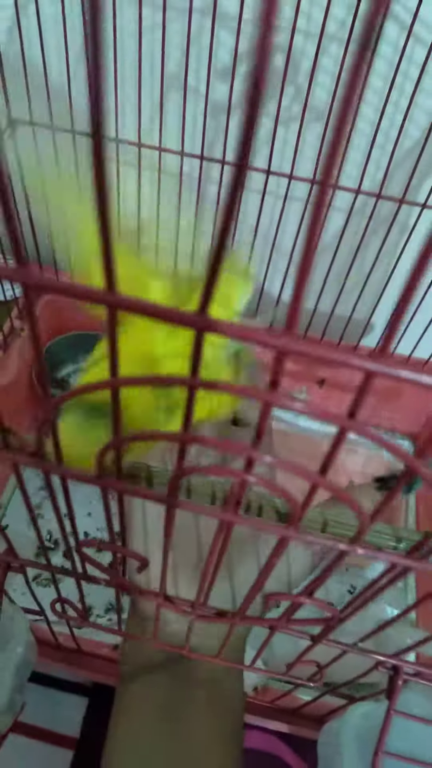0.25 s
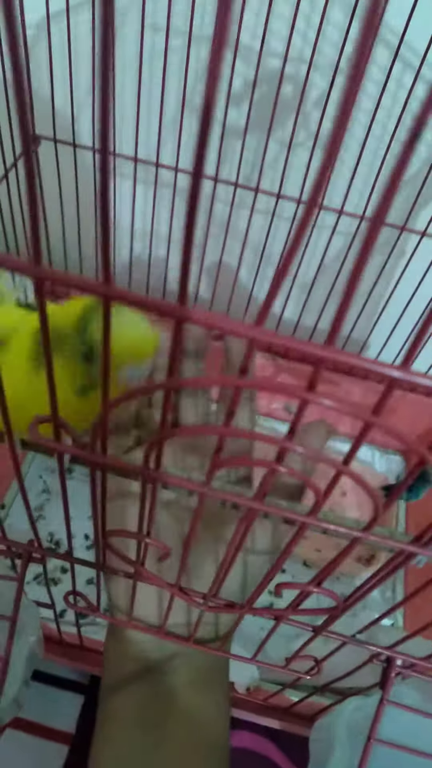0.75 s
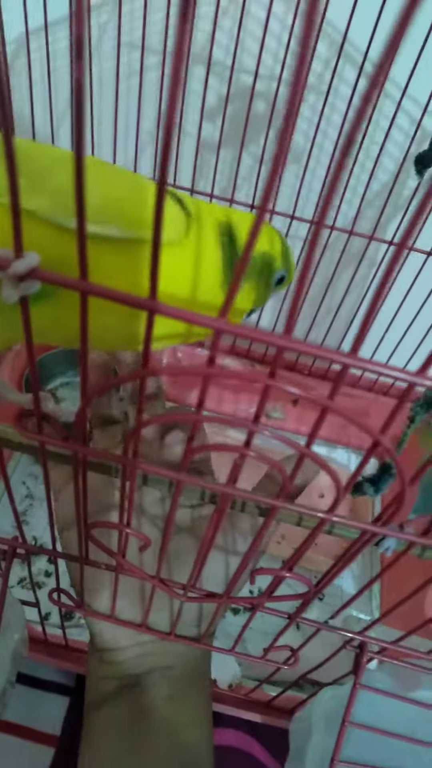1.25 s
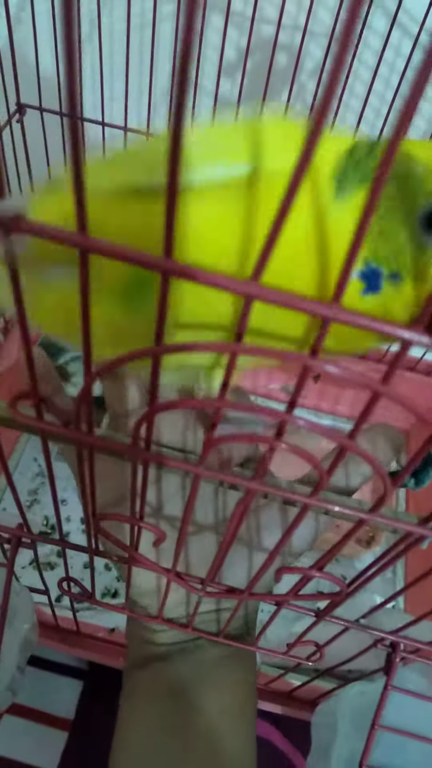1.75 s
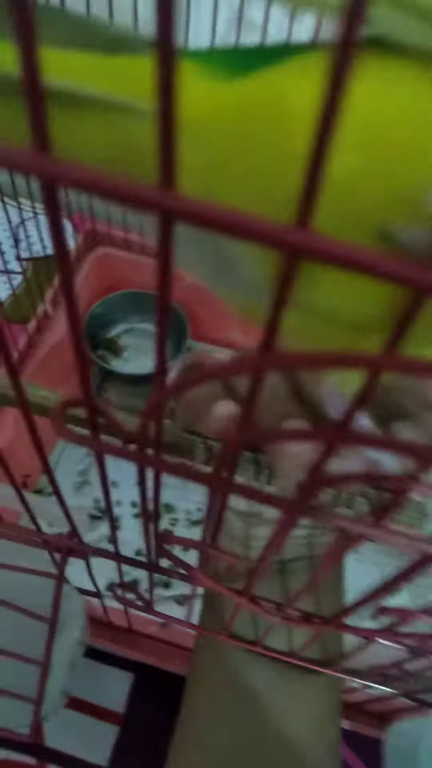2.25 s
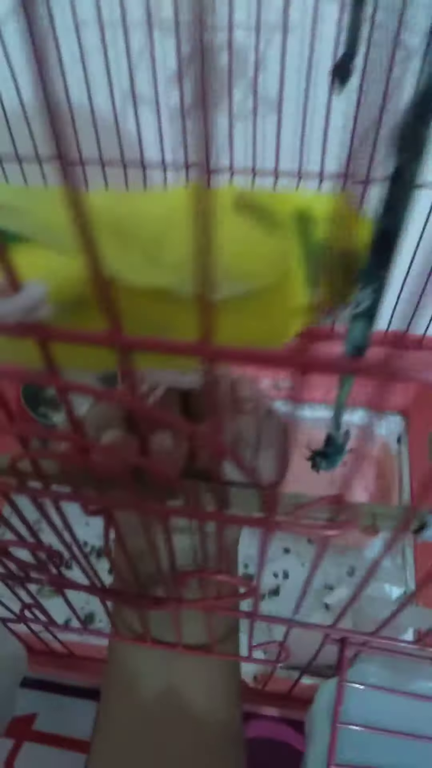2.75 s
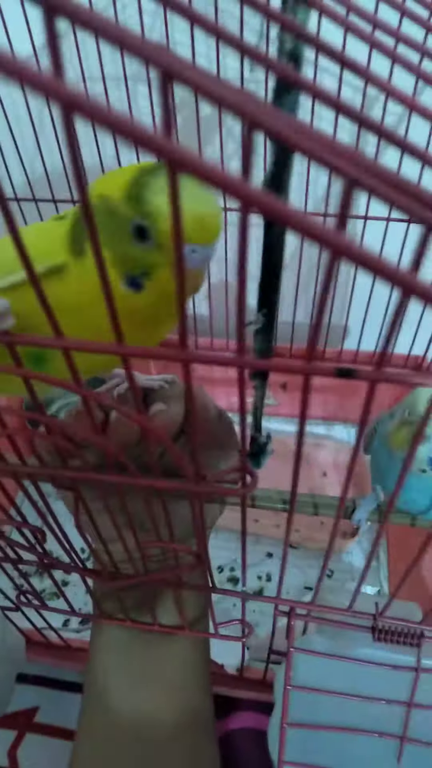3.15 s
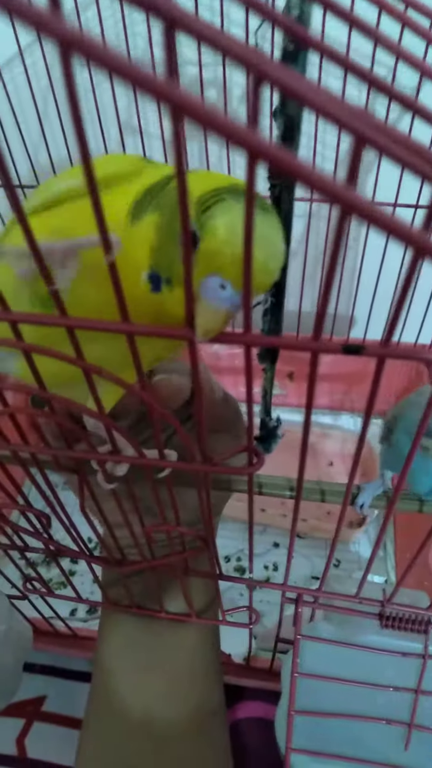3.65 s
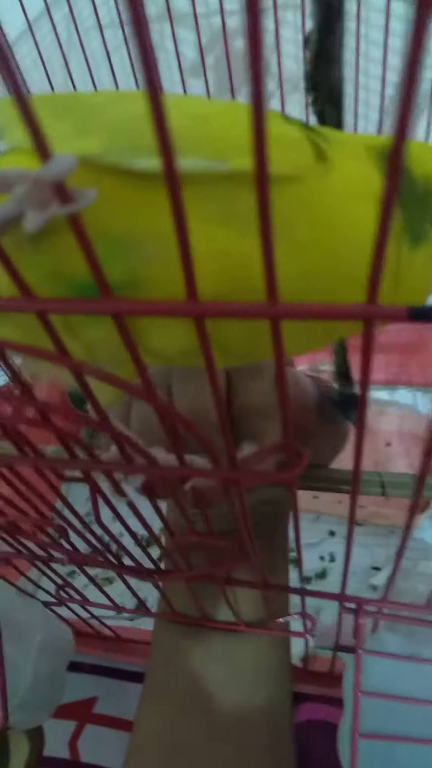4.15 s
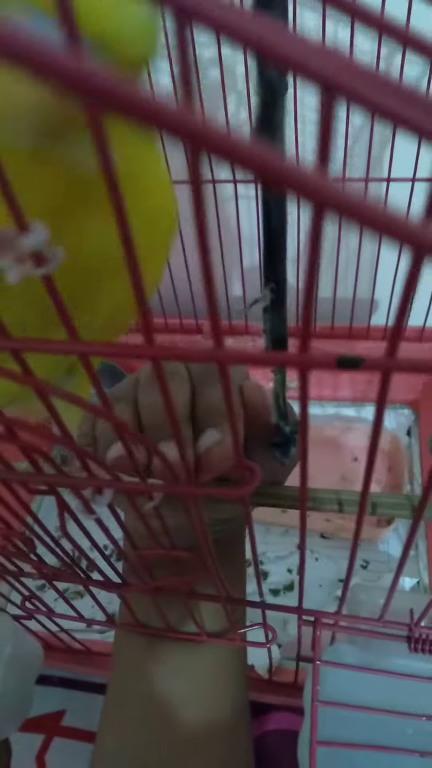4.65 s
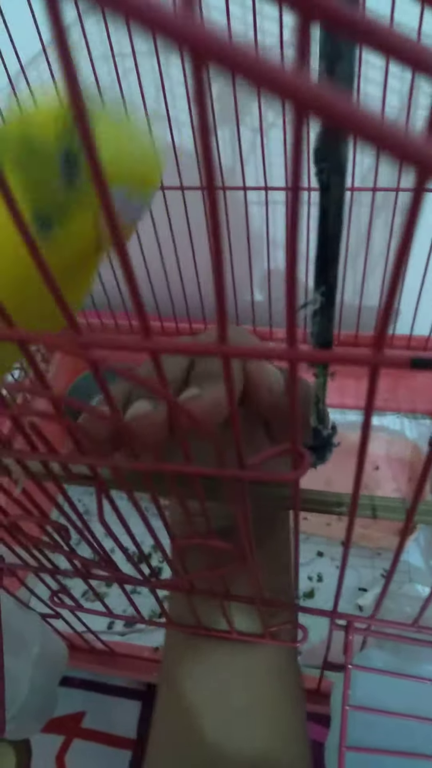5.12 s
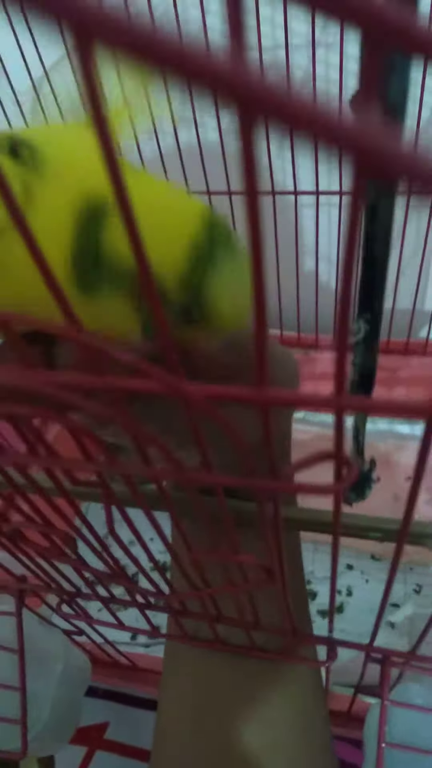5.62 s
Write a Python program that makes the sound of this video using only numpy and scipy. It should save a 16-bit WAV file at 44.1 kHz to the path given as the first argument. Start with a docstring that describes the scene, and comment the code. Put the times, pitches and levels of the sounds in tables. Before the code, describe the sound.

Claws scrape and rattle on thin metal cage bars very close by, with taps, dull bumps and short groans, ending in a bird's harsh squawk.

```python
"""Budgerigars on a wire cage

Budgerigars clamber and flutter on a wire cage, very close by, while a hand reaches in.
Claws and wings scrape the bars: each burst is followed by a short plateau of noise that a gate cuts off.
Taps and bumps are short filtered blows; groans and faint thin tones are narrow bands of noise.
Feathers hiss, the cage rumbles and murmurs, and near the end a bird's clicks run into a harsh squawk."""
import sys
import numpy as np
from scipy import signal
from scipy.fft import rfft, irfft
from scipy.io import wavfile
from scipy.ndimage import uniform_filter1d

SR = 44100
rng = np.random.default_rng(int(sys.argv[2]) if len(sys.argv) > 2 else 0)


def waveform_to_disk(signal):
    """Save audio, clipped to [-1, 1], as 16-bit WAV at the path in sys.argv[1]."""
    frames = np.transpose(np.atleast_2d(signal))
    scaled = np.clip(frames, -1, 1) * 32767
    samples = np.round(scaled).astype(np.int16)
    wavfile.write(sys.argv[1], SR, samples)


N = 259308
HZ = np.fft.rfftfreq(2048, 1 / SR)  # the pitches at which every filter gain is given

# Scrapes on the bars: start_s, stroke_s (nominal), plateau_end_s, clang_db (bars), ring_db (wires),
# brightness_db, main_ring_hz. The clang and ring levels are offset further for each layer.
SCRAPES = [(0.002, .028, .036, -53, -57, -1, 7610), (0.283, .02, .412, -46, -47, 3, 7910),
           (0.299, .008, .405, -47, -45, 5.5, 990), (0.877, .034, 1.004, -40, -41, 0, 1200),
           (1.095, .018, 1.12, -51, -37.5, 0, 7870), (1.117, .013, 1.245, -47, -32.5, 1.5, 7570),
           (1.745, .022, 1.778, -46, -47.5, -4.5, 8580), (1.782, .013, 1.92, -46, -37, 3.5, 9970),
           (1.872, .02, 1.92, -58, -45, 3, 7640), (1.921, .03, 2.055, -39, -42, -2.5, 5240),
           (2.052, .02, 2.18, -45, -35.5, 2, 9550), (2.267, .018, 2.37, -43, -43.5, -4, 7430),
           (3.256, .036, 3.32, -38, -51, -12, 840), (3.314, .016, 3.36, -42, -49, -10, 8060),
           (3.359, .02, 3.448, -40, -38.5, 0, 7380), (3.505, .028, 3.604, -43, -40.5, 3, 7100),
           (3.641, .014, 3.731, -42, -37.5, 3, 1830), (3.757, .014, 3.797, -38, -58, -1, 1400),
           (3.798, .01, 3.812, -43, -64, -2, 1750), (3.809, .013, 3.853, -41, -51, -6.5, 8110),
           (4.761, .012, 4.803, -46, -55, -8, 7070), (4.802, .014, 4.825, -50, -42.5, 0, 7100),
           (4.822, .012, 4.924, -51, -37, 4.5, 9830), (4.987, .028, 5.105, -45, -39.5, 2, 10120),
           (5.13, .016, 5.15, -47, -48.5, 3.5, 7690), (5.148, .022, 5.282, -42, -40.5, 1, 10020),
           (5.563, .016, 5.635, -41, -43.5, -6.5, 7980), (5.631, .009, 5.735, -41, -44.5, -4, 7960)]
# The frame groans as something drags on it: start_s, end_s, level_db, lowest_mode_hz
GROANS = [(0, 0.025, -45, 410), (.29, 0.41, -44.5, 504.5), (1.944, 2.197, -48, 423),
          (2.15, 2.313, -50, 541), (2.285, 2.432, -44.5, 399), (2.435, 2.48, -51.5, 564),
          (4.4, 4.415, -49, 554), (4.444, 4.534, -39, 540), (4.553, 4.63, -39.5, 553),
          (4.64, 4.663, -44.5, 552), (4.681, 4.736, -50.5, 561), (5.59, 5.66, -42.5, 497),
          (5.651, 5.876, -43.5, 436)]
# The cage shifts under the hand: time_s, rumble_db, murmur_db (both before a fixed offset)
HANDLING = [(0.0, -67, -55), (0.36, -57.5, -46.5), (0.83, -54.5, -66.5), (1.05, -56, -54), (1.33, -61, -59),
            (1.65, -52, -70), (1.95, -48.5, -43), (2.23, -52.5, -48.5), (2.49, -59.5, -52.5),
            (2.9, -56.5, -63.5), (3.31, -55.5, -68.5), (3.49, -58, -55), (3.98, -57.5, -58),
            (4.47, -55, -49), (4.62, -55, -54), (5.47, -52.5, -48.5), (5.76, -51, -44), (5.88, -45, -44.5)]


def amp(db):
    """Turns decibels into a plain multiplier."""
    return 10 ** (np.asarray(db) / 20)


def unit(x):
    """Scales x to an rms level of one."""
    return x / np.sqrt(np.mean(x ** 2) + 1e-20)


def at_level(x, db, seconds):
    """Scales x so that its first seconds have the rms level db."""
    return amp(db) * x / np.sqrt(np.mean(x[:round(seconds * SR)] ** 2))


def add(mix, start_s, sound):
    """Adds a sound to the mix at its start time, cut off at the end of the mix."""
    part = mix[max(round(start_s * SR), 0):][:len(sound)]
    part += sound[:len(part)]


def shape(points):
    """Gain over HZ drawn through (Hz, dB) points."""
    f, db = np.transpose(points)
    return amp(np.interp(np.log(HZ + 1), np.log(f + 1), db))


def peak(hz, width_hz):
    """Gain over HZ of one resonance."""
    return 1 / np.sqrt(1 + (2 * (HZ - hz) / width_hz) ** 2)


def band(low_hz, high_hz, order=8):
    """Gain over HZ of a band-pass; a higher order has steeper sides."""
    low_side = 1 + (low_hz / (HZ + 1)) ** (2 * order)
    high_side = 1 + (HZ / high_hz) ** (2 * order)
    return 1 / np.sqrt(low_side * high_side)


def uneven(depth_db, size):
    """Random peaks and dips: every spot on the cage rings differently."""
    ripple = uniform_filter1d(uniform_filter1d(rng.standard_normal(len(HZ)), size), size)
    return amp(depth_db * unit(ripple))


def jangle(size=260):
    """Gain of many quick reflections along the wires: sharp peaks and deep notches, new at every spot."""
    echoes = rng.standard_normal(size) * np.hanning(2 * size)[size:]
    return unit(abs(rfft(echoes, 2 * (len(HZ) - 1))))


def colour(x, gain):
    """Filters x with a gain over HZ, using minimum phase so that nothing sounds ahead of its cause."""
    both_sides = np.r_[gain, gain[-2:0:-1]]
    log_gain = np.log(np.maximum(both_sides, gain.max() * 1e-5))
    response = np.fft.ifft(np.exp(np.conj(signal.hilbert(log_gain)))).real
    return signal.oaconvolve(x, response)[:len(x)]


def narrow(hz, width_hz):
    """One second of noise in a narrow resonance."""
    f = np.fft.rfftfreq(SR, 1 / SR)
    spectrum = rfft(rng.standard_normal(SR)) / (1 + ((f - hz) / width_hz * 2) ** 2)
    return unit(irfft(spectrum, SR))


def grit(count, spread_db):
    """Dense tiny slips: noise whose level jumps at random every 32 samples."""
    steps = np.repeat(rng.standard_normal(count // 32 + 1), 32)[:count]
    return unit(amp(spread_db * steps) * rng.standard_normal(count))


def gate(t, end, rise=0.006, fall=.003):
    """Opens at time zero and dies away after the end (all in seconds)."""
    return (1 - np.exp(-t / rise)) * np.exp(-np.maximum(t - end, 0) / fall)


def wire_rings(main_hz):
    """Gain of the wire modes for one scrape: a main ring, the rest by chance; higher modes are broader."""
    # modes of the bars and wires: pitch_hz, level_db (before the random spread)
    wire_modes = [(850, 1), (1220, -16), (2820, -3.5), (3200, -4), (3640, -9.5), (5470, -9), (6200, -7.5),
                  (7120, -13), (7560, -17.5), (7850, -11), (8840, -8), (10170, -9), (12700, -6),
                  (15400, -5.5)]
    spread_db, main_ring_db = 4, 0.5
    hz, db = np.transpose(wire_modes)
    db = db + spread_db * rng.standard_normal(len(db))
    modes = zip([*hz, main_hz], [*db, main_ring_db])
    return sum(amp(d) * peak(f, 60 + 0.0087 * f) ** 2 for f, d in modes)


def scrapes(clang_db=-1, ring_db=0.0):
    """A burst of tiny slips rings the wires; a short plateau of noise follows, cut off abruptly by a gate."""
    # where the bands thump, frame, clang, rasp, ring and fizz begin and end: edge_hz
    edges_hz = [50, 250, 750, 2200, 6000, 11000, 16000]
    # overall tone of the wires: pitch_hz, gain_db
    wire_tone = [(750, 0), (1250, 2), (1600, -7), (2000, -4.5), (2350, -17.5), (2900, -5.5), (6000, 0),
                 (7500, 2.5), (10200, -0.5), (11200, -0.5), (12800, -2), (15500, 0)]
    # overall tone of the tray and frame: pitch_hz, gain_db
    tray_tone = [(70, 2), (100, 2.5), (130, -3), (240, -9.5), (330, 2), (450, -2), (750, -1)]
    # a long plateau is a weak one: length_s, level_db (before a fixed lift and the fade)
    plateau_levels = [(.045, -5.5), (.1, -9.5)]
    rasp_db, fizz_db = -7.5, -8.5  # below and above the ring; brightness tips the two against each other
    thump_db, frame_db = -51, -51.5  # levels for a scrape with the usual clang
    usual_clang_db, body_share = -42.5, 0.41  # tray and frame follow the clang only in part
    stroke_rise_s, stroke_fall_s, gate_rise_s = 0.00077, 0.0083, 0.00097
    sway_fade_db_per_s, plateau_fade_db_per_s = 24.5, 88.5
    out, t = np.zeros(N), np.arange(SR // 3) / SR
    bands = [band(lo, hi, order=7 if hi < 2500 else 18) for lo, hi in zip(edges_hz, edges_hz[1:])]
    for start, length, end, clang, ring, bright, main_hz in SCRAPES:
        rings = wire_rings(main_hz)
        plateau_db = np.interp(end - start, *np.transpose(plateau_levels))
        body_db = body_share * (clang - usual_clang_db)
        wires = shape(wire_tone) * (jangle() + 0.13 + 7 * rings)
        bars = shape(wire_tone) * (jangle() + 0.091 + 1.6 * rings)  # thicker, so they ring less

        stroke = gate(t, 0.94 * length, rise=stroke_rise_s, fall=stroke_fall_s) * amp(5.0 - 4 * t / length)
        held = gate(t, end - start, rise=gate_rise_s, fall=0.0016)  # the gate that cuts the noise off
        plateau = held * amp(plateau_db + 1.5 - plateau_fade_db_per_s * t)
        after_ring = amp(-19.5 - 270 * t) * (1 - np.exp(-t / 0.028))
        slips = grit(len(t), 3.3) * stroke
        slips += grit(len(t), 2.2) * (plateau + after_ring)
        clang_fade = np.hypot(gate(t, length, rise=.0005, fall=0.024), amp(-1.0 - 71 * t))
        clang_noise = grit(len(t), 2.3) * held * clang_fade
        sway = rng.standard_normal(len(t)) * held * amp(-sway_fade_db_per_s * t)

        # the slips sound the thin wires
        for b, db in zip(bands[3:], (rasp_db - bright, ring_db, fizz_db + bright)):
            add(out, start, at_level(colour(slips, b * wires), ring + db, length))
        # the clang noise sounds the bars
        add(out, start, at_level(colour(clang_noise, bands[2] * bars), clang + clang_db, length + 0.0089))
        # the slow-fading sway sounds the tray and frame
        for b, db in zip(bands, (thump_db, frame_db)):
            body = colour(sway, b * shape(tray_tone) * (jangle() + .5))
            add(out, start, at_level(body, db + body_db, max(end - start, .05)))
    return out


def small_hits(low_hz, high_hz):
    """Random light contacts, stronger while the cage is jostled: rows of (s, dB, Hz)."""
    hits_per_s = 5
    when, size, pitch = rng.random((round(hits_per_s * N / SR), 3)).T
    time_s, _, murmur_db = np.transpose(HANDLING)
    when = when * N / SR
    level_db = np.interp(when, time_s, murmur_db) - 8 * size
    return zip(when, level_db, np.interp(pitch, [0, 1], [low_hz, high_hz]))


def taps():
    """A single hard click of beak or claw with a short after-ring of the wire; harder taps are brighter."""
    # sharp taps on a wire: time_s, peak_db, ring_hz, low_knock_db (relative, before a fixed lift)
    tap_list = [(0.8388, -32.5, 8300, -28), (0.8602, -42, 7670, -41), (1.6599, -43.5, 2900, 8),
                (1.67, -36.5, 2900, 9), (1.714, -20, 7600, 4), (1.728, -34.5, 7900, 20),
                (2.182, -40, 3860, -1), (2.204, -35.5, 3930, -20), (3.2555, -26.5, 3250, 14.5),
                (3.3474, -29, 7500, -23), (4.2016, -44, 4000, -11), (4.2448, -48.5, 2600, -3),
                (4.7249, -37.5, 8200, -2), (4.7507, -32, 4750, 9.5), (5.4727, -35.5, 8100, 13),
                (5.5453, -42, 8200, 16)]
    small_tick_db = -9.5  # offset of the small random ticks
    out, t = np.zeros(N), np.arange(SR // 6) / SR
    small = [(s, db + small_tick_db, hz, -8) for s, db, hz in small_hits(2600, 7000)]
    for start, db, hz, knock_db in tap_list + small:
        blow = rng.standard_normal(len(t)) * (np.exp(-t / 0.0011) + 0.18 * np.exp(-t / 0.032))
        top_hz = np.interp(db, [-38, -30], [8200, 12000])
        wire = band(2300, top_hz, order=9) * (1 + 5 * peak(hz, 400))
        low_knock = amp(knock_db + 8.5) * peak(2300, 700) * band(500, 1800)
        tap = colour(blow, (wire + low_knock) * (jangle() + 0.51))
        add(out, start, amp(db) * tap / abs(tap).max())
    return out


def bumps():
    """A soft blow of noise rings the frame briefly; a short low sine is the thud of the whole cage."""
    # dull bumps of the cage: time_s, knock_peak_db, main_ring_hz, thud_db (before a fixed lift)
    bump_list = [(0.058, -44.5, 404, -52), (0.107, -43.5, 1140, -37), (0.477, -43, 694, -51),
                 (0.601, -41.5, 533, -48), (0.763, -58, 790, -44.5), (0.834, -44, 750, -57),
                 (0.86, -36.5, 410, -45), (1.67, -36, 1410, -48), (2.182, -33, 556, -37),
                 (2.235, -30.5, 546, -38), (2.408, -35, 396, -48.5), (4.186, -34.5, 490, -47),
                 (4.202, -33.5, 520, -37.5), (4.243, -39, 515, -61), (4.407, -35, 537, -54),
                 (4.449, -35, 525, -39.5), (4.553, -32.5, 550, -40.5), (4.718, -38.5, 570, -38),
                 (4.761, -39, 566, -32.5), (5.37, -40.5, 333, -56), (5.39, -37, 540, -36.5),
                 (5.407, -44, 880, -36.5), (5.474, -31.5, 842, -44.5), (5.531, -39.5, 630, -43)]
    small_knock_db, small_thud_db = 10, -3  # offsets of the small random knocks
    out, t = np.zeros(N), np.arange(SR // 6) / SR
    small = [(s, db + small_knock_db, hz, db + small_thud_db) for s, db, hz in small_hits(350, 900)]
    for start, db, hz, thud_db in bump_list + small:
        blow = rng.standard_normal(len(t)) * gate(t, .004, rise=.001, fall=.002)
        frame = band(250, 1400, order=5) * (0.07 + peak(hz, 85)) * uneven(2.5, size=5)
        knock = colour(blow, frame)
        thud = np.sin(2 * np.pi * rng.uniform(80, 120) * t) * np.exp(-t / 0.0049)
        add(out, start, amp(db) * knock / abs(knock).max() + amp(thud_db + 7.5) * thud)
    return out


def groans():
    """Uneven slips keep the modes of the frame sounding: narrow noise bands of wavering level."""
    # modes of the frame: multiple of the lowest mode, width_hz, level_db (relative)
    frame_modes = [(1.001, 29.3, 0.5), (1.419, 53, -8), (1.95, 80, -14.5), (2.52, 59.8, -15)]
    slip_db, slip_s = 2.5, 0.0121  # the drag catches and lets go: depth and duration of a slip
    out, t = np.zeros(N), np.arange(SR // 2) / SR
    for start, end, db, hz in GROANS:
        modes = sum(amp(mode_db) * narrow(hz * multiple, width)[:len(t)]
                    for multiple, width, mode_db in frame_modes)
        catches = rng.standard_normal(len(t))
        modes = modes * amp(slip_db * np.interp(t / slip_s, np.arange(len(t)), catches))
        groan = at_level(modes, db, end - start)
        add(out, start, groan * gate(t, end - start, rise=0.0013, fall=0.0051))
    return out


def feathers():
    """Grainy hiss of wings and tail sliding along the bars."""
    # feathers brush the bars: start_s, end_s, level_db
    swishes = [(0.167, 0.275, -61.5), (0.255, 0.316, -53), (.79, 0.83, -67.5), (1.17, 1.238, -45),
               (1.245, 1.346, -72), (1.738, 1.962, -54), (2.28, 2.423, -66.5), (3.182, 3.247, -58.5),
               (3.265, 3.337, -49), (4.18, 4.21, -50.5), (4.217, 4.306, -70.5), (5.175, 5.271, -51),
               (5.379, 5.414, -61.5), (5.459, 5.486, -52), (5.581, 5.688, -54)]
    # tone of the brushing: pitch_hz, gain_db (relative)
    feather_tone = [(300, -4), (1000, 10), (2200, 6), (4000, 4.5), (6000, -0.5), (8000, 3), (9000, -11),
                    (10200, -30), (16000, -27.5)]
    out, t = np.zeros(N), np.arange(SR // 3) / SR
    for start, end, db in swishes:
        brush = grit(len(t), 3) * gate(t, end - start, rise=.018, fall=.005)
        add(out, start, amp(db) * colour(brush, unit(shape(feather_tone) * (jangle() + .5))))
    return out


def squawk():
    """A few separate clicks run together into a harsh rasp through the resonances of the bird's throat."""
    # single opening clicks: time_s, peak_db
    opening_clicks = [(5.7415, -27), (5.7695, -27), (5.7805, -26), (5.788, -26)]
    # course of the rasp: time_s, level_db
    rasp_course = [(5.742, -66), (5.775, -49), (5.80, -41.5), (5.83, -41), (5.845, -36.5), (5.88, -41.5)]
    # resonances of the throat: pitch_hz, width_hz, level_db (relative)
    throat_modes = [(880, 850, 1), (2240, 180, -3), (2800, 510, 5), (3720, 1000, -20.5), (4490, 270, 4),
                    (5740, 340, -17), (7135, 240, 3.5), (7120, 750, -1.5), (10970, 590, -5),
                    (13330, 370, 5.5), (14400, 700, 4)]
    throat = sum(amp(db) * peak(hz, width) ** 2 for hz, width, db in throat_modes)
    time_s, level_db = np.transpose(rasp_course)
    effort = amp(np.interp(np.arange(N) / SR, time_s, level_db, left=-150))
    out = colour(grit(N, 3) * effort, unit(throat))
    t = np.arange(SR // 20) / SR
    click_tone = throat * (1 - 0.82 * peak(6500, 2400) ** 2)  # weaker around 6500 Hz
    for start, db in opening_clicks:
        click = colour(rng.standard_normal(len(t)) * np.exp(-t / 0.0013), click_tone)
        add(out, start, amp(db) * click / abs(click).max())
    return out


def swell(seconds, hz, width_hz):
    """A thin tone, made of narrow noise, that swells and fades."""
    tone = unit(narrow(hz, width_hz)[:round(max(seconds, .02) * SR)])
    return tone * unit(signal.windows.tukey(len(tone), .8))


def tones(count=4):
    """Faint held tones with a few overtones, and high wisps of broader noise."""
    # faint held tones: start_s, end_s, pitch_hz, width_hz, level_db, first_overtone_db (relative)
    held_tones = [(0, 0.597, 582, 40, -80.5, 1), (.76, 0.89, 831, 6, -65, -32),
                  (1.181, 1.615, 580.5, 23.6, -73.5, 0), (1.406, 1.92, 552, 1.9, -62.5, -26.5),
                  (2.421, 2.96, 559, 4.5, -66, -7.5), (2.961, 3.226, 624, 2, -66, -11.5)]
    # faint high wisps: start_s, end_s, pitch_hz, level_db
    wisps = [(0.03, 0.14, 8070, -69), (0.436, .503, 8300, -74), (2.62, 2.81, 8000, -67.5),
             (3.933, 3.985, 6370, -72), (4.042, 4.097, 9600, -78.5)]
    out = np.zeros(N)
    for start, end, hz, width, db, fall_db in held_tones:
        for k in range(count):
            overtone = swell(end - start, (k + 1) * hz, (k + 1) * width)
            add(out, start, amp(db + fall_db * k ** 2.0) * overtone)
    for start, end, hz, db in wisps:
        add(out, start, amp(db) * swell(end - start, hz, width_hz=1400))
    return out


def shake():
    """How hard the cage shakes, 0-1: it builds up during each scrape or groan and settles afterwards."""
    out, t = np.zeros(N), np.arange(SR // 2) / SR
    for start, end in [(row[0], row[2]) for row in SCRAPES] + [row[:2] for row in GROANS]:
        add(out, start, gate(t, end - start, rise=0.0099, fall=0.011))
    return np.minimum(out, 1)


def handling(rumble_db=-1.0, murmur_db=-3.5):
    """Low rumble and murmur of the jostled cage, made of filtered noise, over a trace of hiss."""
    # tone of the rumble: pitch_hz, gain_db (relative)
    rumble_tone = [(12, -46), (20, -26), (57, -1), (81, 1.5), (253, -16), (300, -12), (390, -40),
                   (660, -120)]
    # tone of the murmur of the frame: pitch_hz, gain_db (relative)
    murmur_tone = [(120, 0.5), (220, 3), (330, -2.5), (420, -1), (560, 5.5), (680, -10), (850, -4),
                   (1150, -7.5), (1500, -24.5), (2400, -41), (5000, -43), (9000, -41.5)]
    shake_rumble_db, shake_murmur_db = -50, -54.5  # every scrape and groan shakes it further
    time_s, *curves = np.transpose(HANDLING)
    low, mid = (np.interp(np.arange(N) / SR, time_s, db) for db in curves)
    shaking = shake()
    rumble = unit(colour(rng.standard_normal(N), shape(rumble_tone) * band(51, 300, order=4)))
    murmur = unit(colour(grit(N, 5.74), shape(murmur_tone)))
    rumble_level = np.hypot(amp(low + rumble_db), amp(shake_rumble_db) * shaking)
    murmur_level = np.hypot(amp(mid + murmur_db), amp(shake_murmur_db) * shaking)
    hiss = amp(-87) * rng.standard_normal(N)
    return rumble * rumble_level + murmur * murmur_level + hiss


def room(x, t60=0.26):
    """A small room: a short, dull tail of reflections, made of noise that falls 60 dB in t60 seconds."""
    t = np.arange(SR // 2) / SR
    reflections = rng.standard_normal(len(t)) * amp(-60 * t / t60) * (t > .005)
    tail = colour(reflections, shape([(200, 2.0), (1500, 3.5), (8000, 0.5), (14000, -12.5)]))
    return signal.oaconvolve(x, tail / np.linalg.norm(tail))[:N]


def scene():
    """All cage and bird sounds with their room, plus the faint tones and the handling."""
    cage = scrapes() + taps() + bumps() + groans() + feathers() + squawk()
    return (cage + amp(-16.5) * room(cage) + tones() + handling())[None]


def record(dry):
    """A steep low-pass sets the upper band limit of the recorder."""
    cutoff_hz = 15900
    low_pass = signal.firwin(401, cutoff_hz, window=("kaiser", 8), fs=SR)
    return signal.oaconvolve(dry, low_pass[None], "same")


dry = scene()
out = record(dry)
waveform_to_disk(out)
```